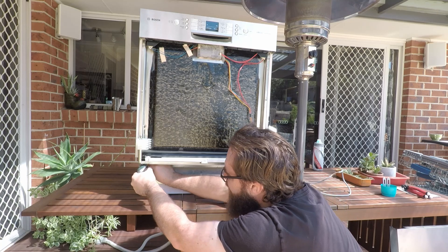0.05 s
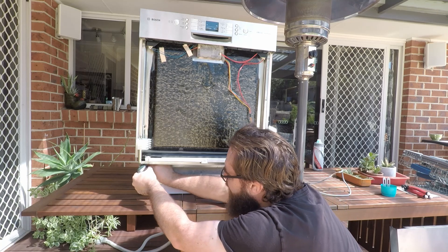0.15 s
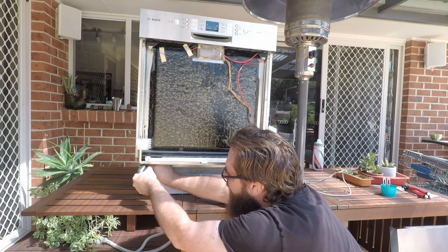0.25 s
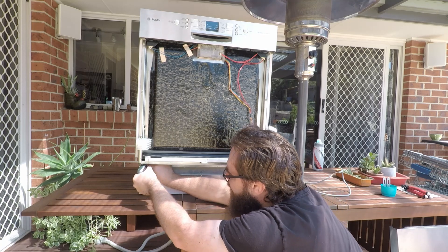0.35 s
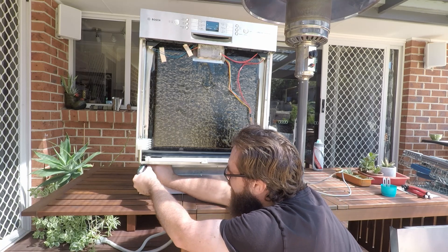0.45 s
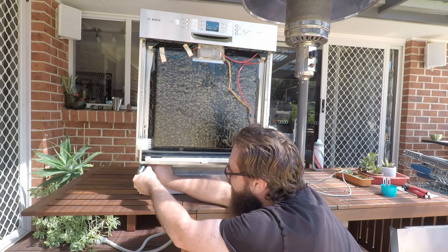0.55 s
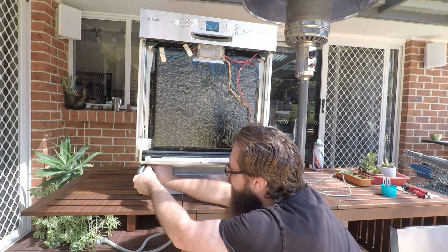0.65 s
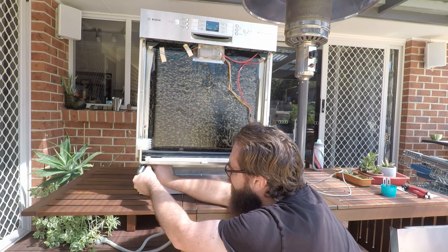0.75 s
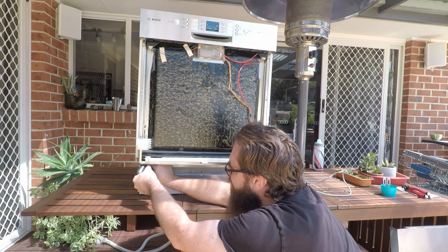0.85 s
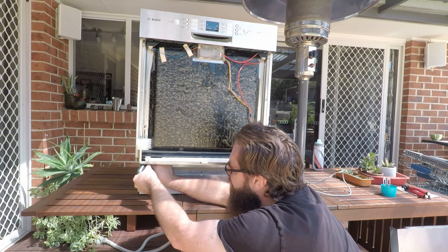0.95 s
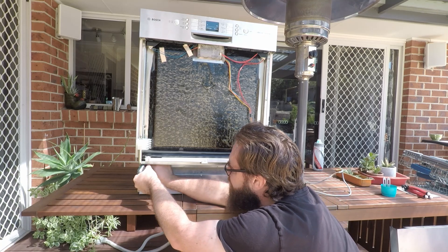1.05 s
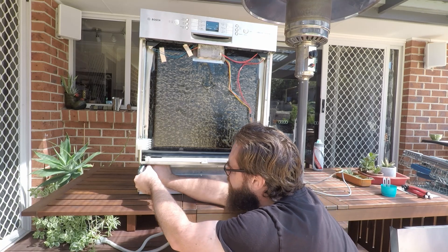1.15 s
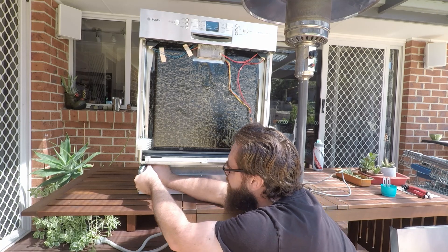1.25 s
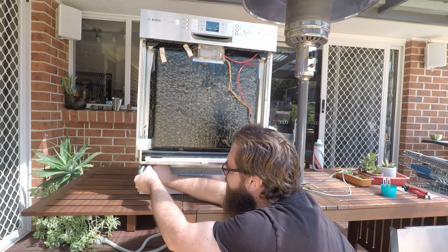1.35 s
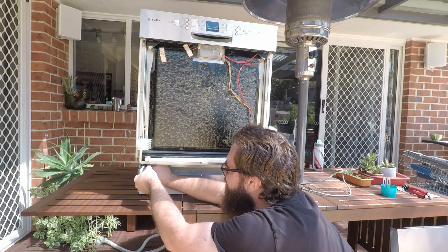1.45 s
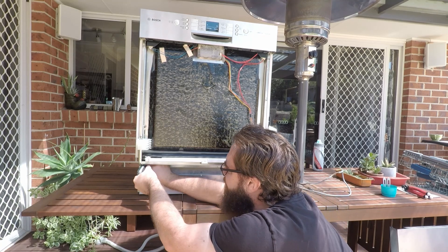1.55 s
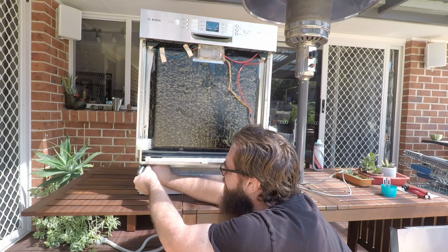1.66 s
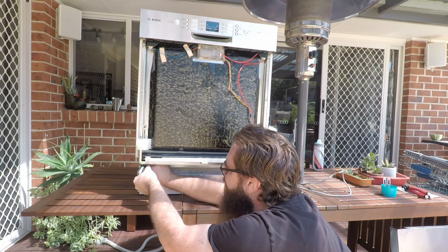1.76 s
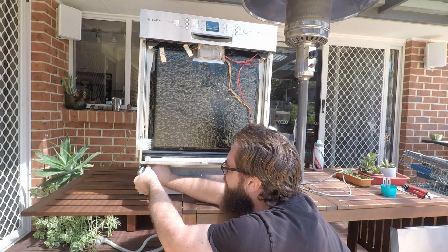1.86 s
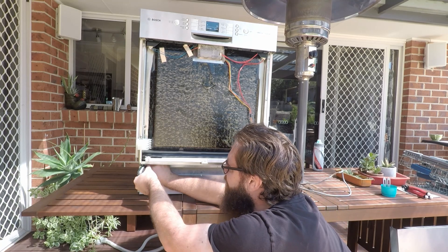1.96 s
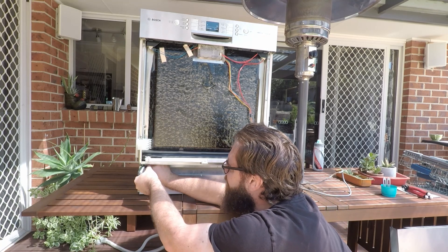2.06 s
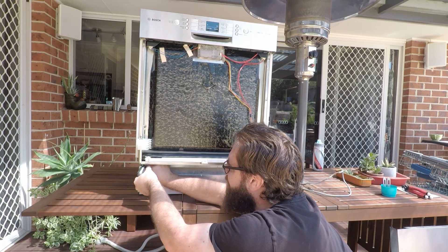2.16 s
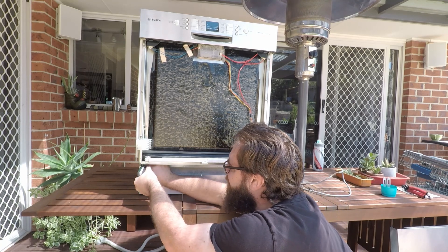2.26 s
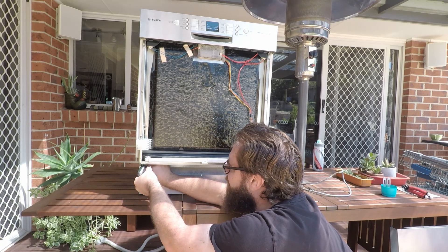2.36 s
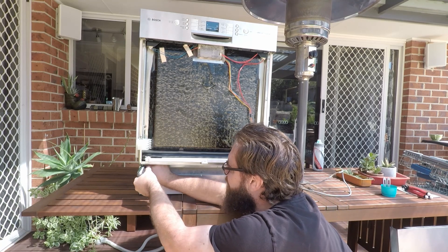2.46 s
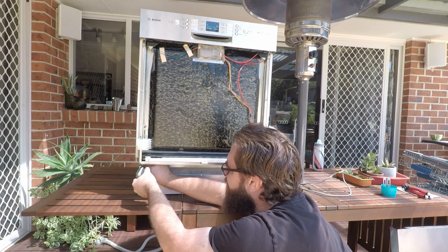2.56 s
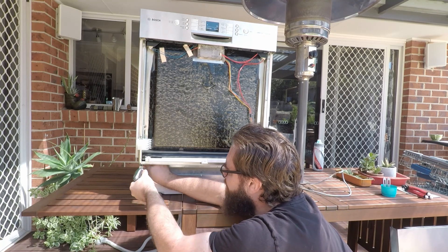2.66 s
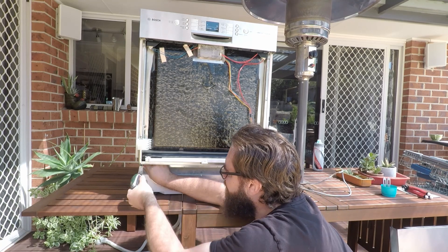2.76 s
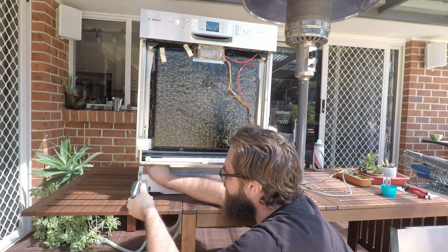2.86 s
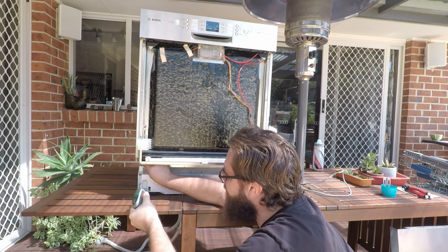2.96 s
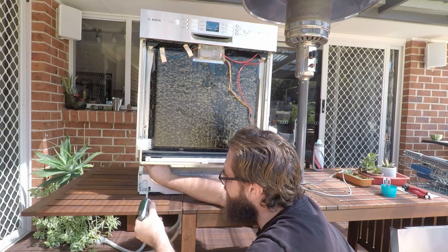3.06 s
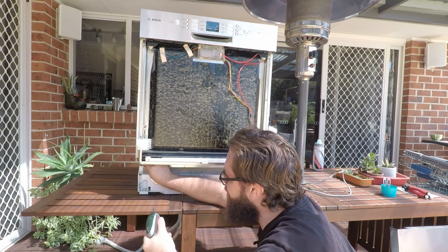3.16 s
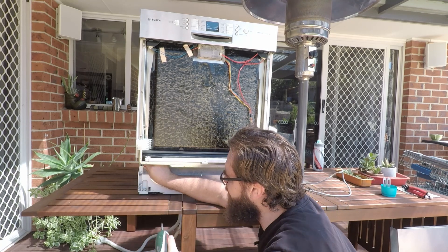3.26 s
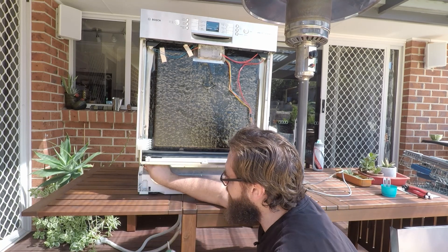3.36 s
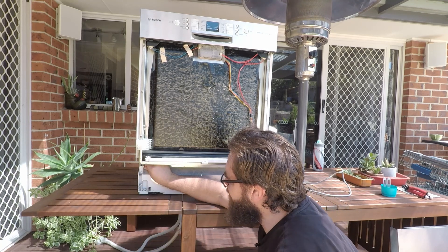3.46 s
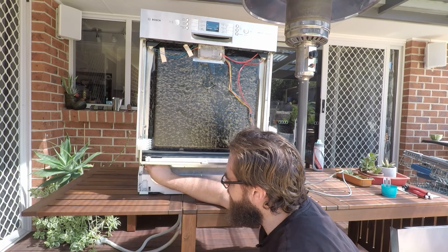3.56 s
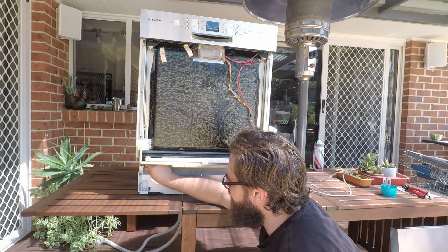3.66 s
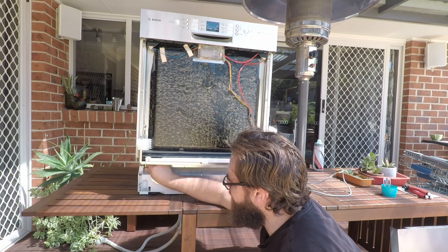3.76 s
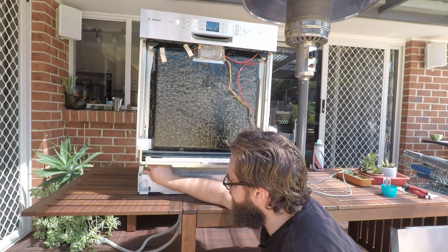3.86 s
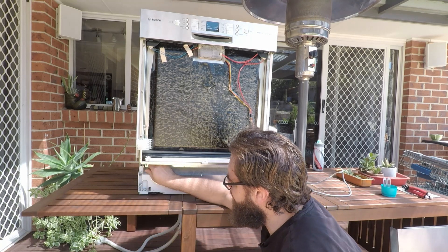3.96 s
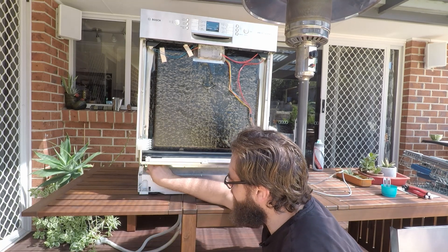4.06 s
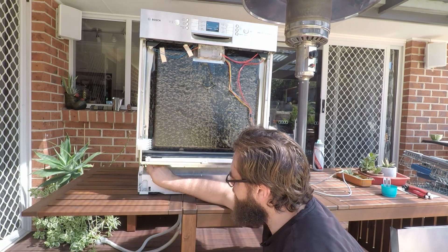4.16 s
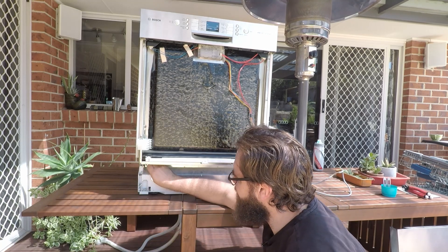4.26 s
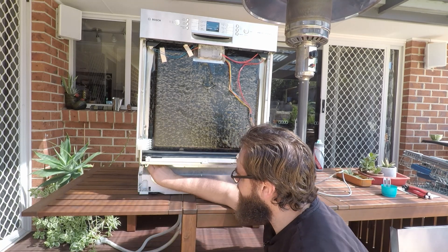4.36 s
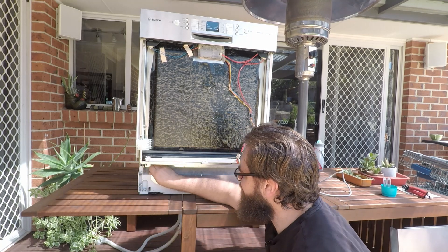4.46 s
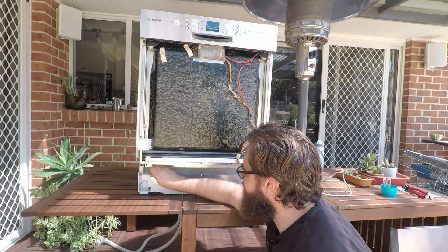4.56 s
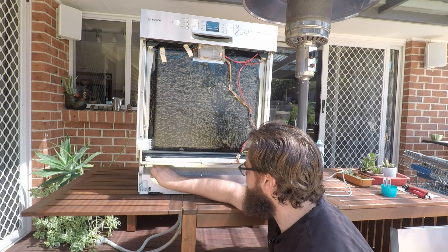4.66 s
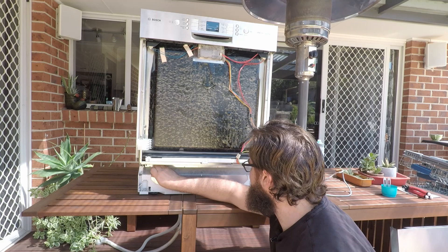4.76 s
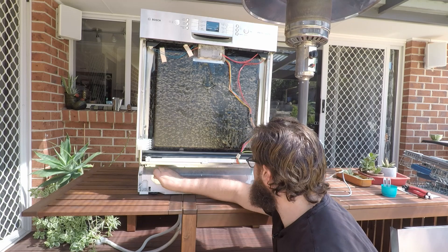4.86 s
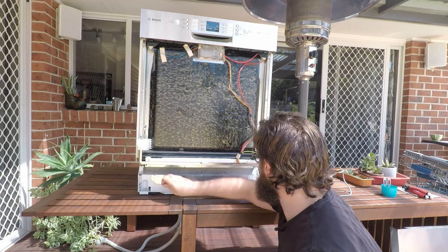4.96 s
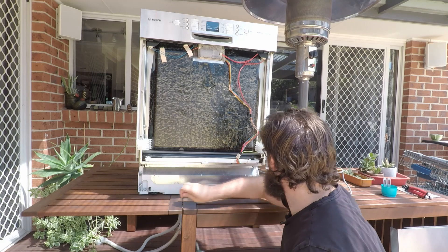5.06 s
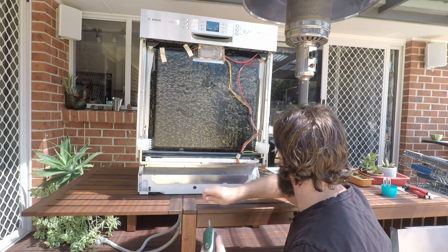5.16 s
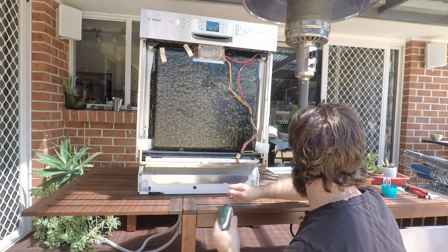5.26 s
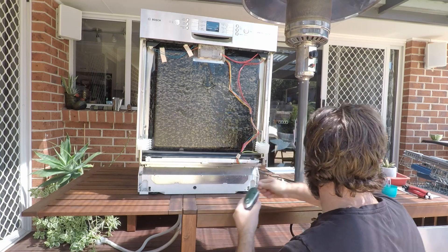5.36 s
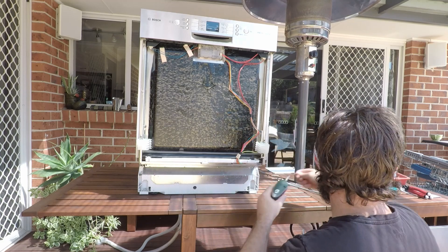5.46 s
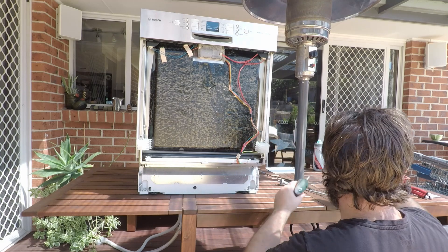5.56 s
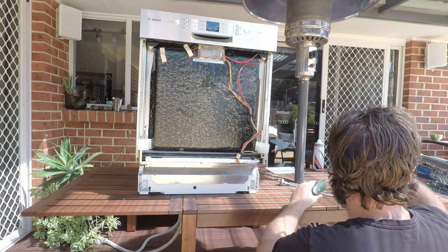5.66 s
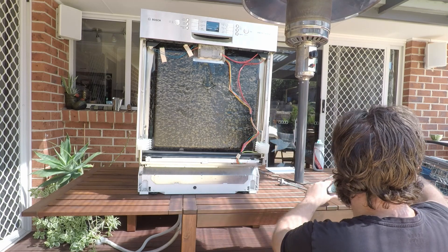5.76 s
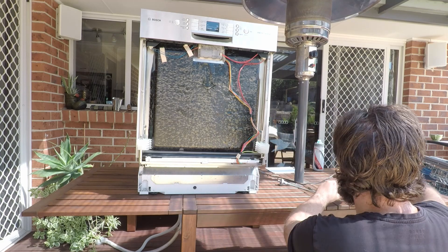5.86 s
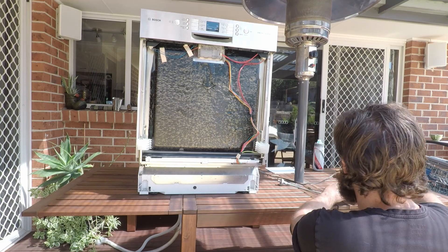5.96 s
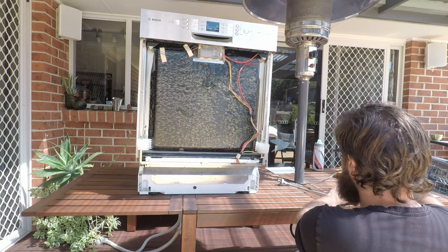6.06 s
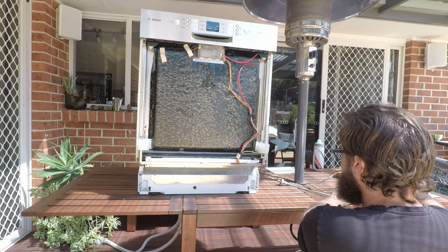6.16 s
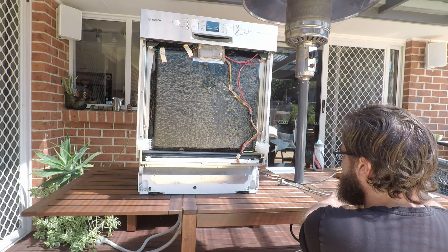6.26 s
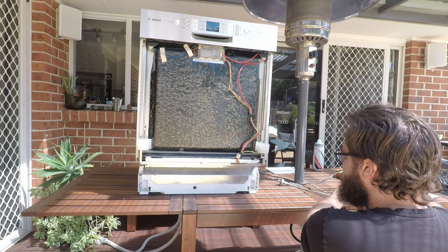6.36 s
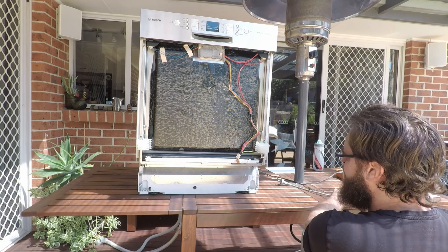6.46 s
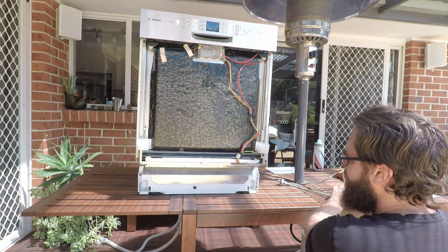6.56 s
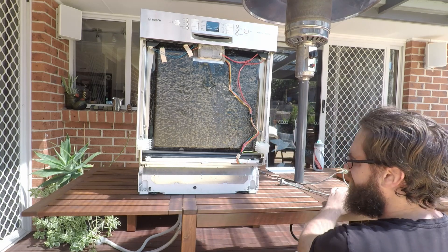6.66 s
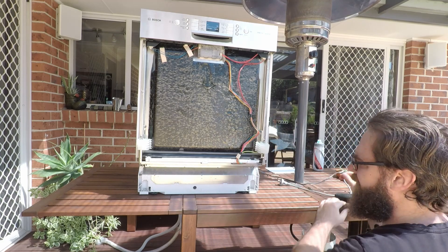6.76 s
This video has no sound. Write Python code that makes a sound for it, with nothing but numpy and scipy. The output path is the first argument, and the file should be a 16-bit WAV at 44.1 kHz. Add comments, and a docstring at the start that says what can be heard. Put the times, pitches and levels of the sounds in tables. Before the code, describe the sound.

Steady whirring of a handheld power screwdriver fills the opening, then its motor slides down to silence with a small thump. Loose ticks and a hard bright clack on a hollow metal cabinet come next, then short scrapes and soft thuds on a wooden table. Calm follows, then a late flurry of clicks and rattling. Covered patio, close microphone, short reflections, low outdoor wash and a faint distant engine.

```python
"""Screwdriver on a sheet-metal cabinet

A small cordless screwdriver backs a screw out of a cabinet on a patio table and coasts to a stop:
harmonics of the motor turn and pulsed gear noise excite the resonances of its housing.
The tool and loose parts then tap (clicks and ringing modes), knock (low damped blows) and scrape (filtered
slips) on cabinet and wood, over a distant engine hum, a faint gliding tone, a low outdoor wash and a hiss."""
import sys
import numpy as np
from scipy import signal
from scipy.fft import rfft, irfft
from scipy.io import wavfile
from scipy.ndimage import uniform_filter1d

SR = 44100
rng = np.random.default_rng(int(sys.argv[2]) if len(sys.argv) > 2 else 0)


def generate_wav(signal):
    """Clip the signal to [-1, 1] and save it as 16-bit WAV at the path in sys.argv[1]."""
    frames = np.transpose(np.atleast_2d(signal))
    scaled = np.clip(frames, -1, 1) * 32767
    pcm = np.round(scaled).astype(np.int16)
    wavfile.write(sys.argv[1], SR, pcm)


N = 299880
HZ, T = np.fft.rfftfreq(N, 1 / SR), np.arange(N) / SR

# Modes of the struck or shaken metal: [pitch_hz, rel_level_db, t60_s]
PANEL_MODES = [(1368, -9, 0.044), (1705, -3, 0.11), (2015, -9, 0.12), (2400, -7, 0.1), (2690, -9, 0.085),
               (3000, -14, 0.12), (3800, -13, 0.07), (6080, -22, 0.07)]
CABINET_UNTIL_S = 4  # contacts fall on the hollow cabinet before this, on solid parts after


def amp(db):
    """Decibels are a logarithmic measure of amplitude: 20 dB is a factor of ten."""
    return 10 ** (np.asarray(db) / 20)


def evened(x):
    """Normalisation: division by the root mean square gives unit power."""
    return x / np.sqrt(np.mean(x ** 2) + 1e-20)


def add(mix, s, sound):
    """Superposition: adds a sound to the mix from s seconds on."""
    part = mix[round(s * SR):][:len(sound)]
    part += sound[:len(part)]


def coloured(x, points):
    """Spectral shaping: weights x by a table of (Hz, dB), interpolated over log frequency."""
    f, db = np.transpose(points)
    gain = amp(np.interp(np.log(HZ + 1), np.log(f + 1), db))
    return irfft(rfft(x) * gain, N)


def band(x, lo_hz, hi_hz):
    """Band-pass filtering: a Butterworth filter keeps what lies between two frequencies."""
    sos = signal.butter(2, [lo_hz, min(hi_hz, .45 * SR)], "band", fs=SR, output="sos")
    return signal.sosfilt(sos, x)


def resonate(x, hz, width):
    """Heterodyned resonance: shifts hz (fixed or moving) to zero, smooths, shifts back; peak gain 1."""
    turn = np.exp(2j * np.pi * np.cumsum(hz * np.ones(len(x))) / SR)
    r = np.exp(-np.pi * width / SR)
    smoothed = signal.lfilter([1 - r], [1, -r], x / turn)
    return 2 * (turn * smoothed).real


def wander(per_s):
    """Slow random modulation of rms 1: twice-averaged noise, sampled coarsely and interpolated."""
    size = max(round(SR / per_s), 1)
    step = max(size // 20, 1)
    coarse = rng.standard_normal(N // step + 2)
    for _ in range(2):
        coarse = uniform_filter1d(coarse, size // step)
    return np.interp(np.arange(N) / step, np.arange(len(coarse)), evened(coarse))


def stroke(s, db, rise_db_per_s, fall_db_per_s):
    """Exponential envelope: climbs to its peak at s and falls away, both straight in dB."""
    return amp(db - np.where(T < s, rise_db_per_s * (s - T), fall_db_per_s * (T - s)))


def screwdriver():
    """Periodic excitation: like knocks each motor turn make harmonics, and shake loose puffs of noise."""
    # Colour of gearbox and housing: [pitch_hz, rel_level_db]
    housing = [(110, -32.5), (180, -12.5), (555, 0), (1030, -1.5), (1620, 4), (2790, -5.5), (3500, -4),
               (5450, -4), (6260, -2), (7400, -5.5), (12300, -4.5), (16000, -25)]
    # Gear whine: [multiple_of_motor_turn, rel_level_db]
    gear_tones = [(1.685, -55), (5.06, -49), (5.6, -58), (6.74, -57), (10.11, -54), (10.7, -55),
                  (11.92, -51), (15.17, -55), (16.84, -53)]
    # Bright resonances of the shell: [pitch_hz, width_hz, drift_db_per_s]
    shell = [(3600, 700, -1), (5600, 350, 8), (6350, 450, -2), (9000, 500, 5)]
    # Multiples of the turn that partly cancel: {order: level_db}
    weak_orders = {3: -8, 6: -8, 15: -5, 16: -8, 20: -6, 24: -4}
    run_turns_per_s, gain_turns_per_s2 = 138.8, .42  # the screw loosens, so the motor slowly gains speed
    release_s, coast_turns_per_s2 = 2.23, 143  # the trigger is let go and the motor slows steadily
    run_db, coast_db_per_s = -34.5 + 1.5, 26.5  # body rms while running, and its fall while coasting
    faster_fall_s, extra_fall_db_per_s = 2.436, 47.5  # from here the level falls faster still
    whine_gain_db = 35.0 - 1.5  # of the whine over the body
    flutter_db, grip_db = 3, 2.5  # the grip shifts on the shell
    stack_share, shell_share = .33, .8
    drift_zero_s = 0.9  # the drifting resonances have no drift gain here

    coasting = np.maximum(T - release_s, 0)
    speed = run_turns_per_s + gain_turns_per_s2 * T - coast_turns_per_s2 * coasting
    speed = np.maximum(speed, 0)
    turns = np.cumsum(speed * (1 + .0015 * wander(15))) / SR + .0025 * wander(140)
    turns += .0075 * np.sin(2 * np.pi * .1 * turns)  # the planet carrier, ten times slower, tugs at the motor
    extra_fall_db = extra_fall_db_per_s * np.maximum(T - faster_fall_s, 0)
    level = amp(run_db - coast_db_per_s * coasting - extra_fall_db)
    mesh = (speed / speed.max()) ** 8  # the teeth lose their load as soon as the motor coasts

    stack = np.zeros(N)
    for k in range(3, 46):
        strength = amp(flutter_db * wander(7.26) + weak_orders.get(k, 0)) / (1 + (k / 50) ** 2)
        phase = 0.009 * k ** 2  # smears the knock a little
        stack += strength * np.cos(2 * np.pi * k * turns + phase)
    puff = 0.45 + amp(wander(220)) * np.exp(-((turns + 0.057) % 1) / 0.5)
    uneven = amp(.7 * wander(40) + 1.5 * wander(1200))
    rattle = evened(puff * uneven * rng.standard_normal(N)) + stack_share * mesh * evened(stack)

    bright = np.zeros(N)
    for hz, width, drift in shell:
        drift_db = drift * (np.minimum(T, release_s) - drift_zero_s)
        bright += amp(grip_db * wander(24.0) + drift_db) * resonate(rattle, hz, width)
    body = coloured(rattle + shell_share * bright, housing)
    whine = sum(amp(db + flutter_db * wander(25)) * np.sin(2 * np.pi * k * turns) for k, db in gear_tones)
    return level * (body / np.std(body[:SR]) + amp(whine_gain_db) * mesh * whine)


def taps():
    """Impact excitation: a short click, then a decaying rattle in several bands that also rings the panel."""
    # Taps on metal and plastic: [start_s, level_db, click_pitch_hz, treble_db, ring_db]
    tap_rows = [(2.485, -24, 1340, 2.5, -4.5), (2.5542, -21.5, 1660, -30, -8), (2.587, -31, 1250, 0.5, 1),
                (2.601, -31.5, 1090, 2, -3.5), (2.7635, -17, 1840, 1.5, -12.5), (2.846, -30, 2030, -6, -15),
                (2.855, -20.5, 2020, -6.5, -15.5), (2.9772, -35.5, 2060, -3.5, -4),
                (3.0074, -32.5, 1730, -11, -6), (3.0774, -13, 1830, -12, -7.5),
                (3.0867, -6, 1920, -0.5, -17), (3.3488, -23.5, 1820, -5, -4),
                (3.394, -26.5, 2100, -12, -16.5), (3.473, -32.5, 1670, -15, -9.5),
                (3.519, -18.5, 1610, -5, -8), (3.649, -33, 1390, -9.5, -3.5),
                (3.7772, -24, 1320, -18, -8.5), (3.8964, -30, 2510, 10, -17),
                (5.129, -35.5, 1770, -20, -23), (5.1986, -44.5, 2460, -27, -22),
                (5.601, -40.5, 10900, -10, -28), (6.106, -21, 1460, 6, -12), (6.18, -21.5, 1210, -7, -19),
                (6.238, -23.5, 1170, -7, -12), (6.298, -19.5, 1320, 4.5, -6.5),
                (6.3937, -24, 1330, -12, -17), (6.415, -24.5, 1290, -10, -18),
                (6.483, -27.5, 2730, -5.5, -9), (6.496, -26, 2650, -26, -11.5),
                (6.7797, -33.5, 10000, -17, -49.5)]
    hollow_db, solid_db = -3.5, -14  # low rattle of the hollow cabinet and of solid parts
    spot_db, metal_share = 3.5, .07  # each blow lands elsewhere and favours other modes

    out, t = np.zeros(N), np.arange(SR // 2) / SR
    modes = np.array([amp(db - 60 * t / t60) * np.sin(2 * np.pi * hz * t) for hz, db, t60 in PANEL_MODES])
    fall = amp(-60 * t / 0.066) * (1 - np.exp(-t / 0.0015))
    for s, db, hz, treble_db, ring_db in tap_rows:
        noise = rng.standard_normal(len(t))
        click = np.sin(2 * np.pi * hz * t) * (t * hz) ** 2 * np.exp(-t * hz / 0.58)
        snap = .5 * evened(band(noise, 4000, 10500)) * np.exp(-t / 0.0009)
        ring = evened(band(band(noise, 0.81 * hz, 1.46 * hz), 0.89 * hz, 1.49 * hz))
        low_db = hollow_db if s < CABINET_UNTIL_S else solid_db
        ring += amp(low_db) * evened(band(noise, 400, 950))
        if s > CABINET_UNTIL_S and hz < 1600:  # solid parts click and ring about an octave up as well
            click += 0.49 * np.sin(4 * np.pi * hz * t) * (t * hz) ** 2 * np.exp(-t * hz / 0.54)
            ring += 0.92 * evened(band(noise, 2.25 * hz, 2.57 * hz))
        ring += amp(treble_db) * evened(band(noise, 3200, 9400)) * fall ** 0.84

        strike = noise[:200] * np.exp(-t[:200] / 0.0023)
        mode_mix = amp(spot_db * rng.standard_normal(len(PANEL_MODES))) @ modes
        metal = signal.fftconvolve(strike, mode_mix)[:len(t)]
        metal *= metal_share * min(hz / 1700, 1) ** 2  # low taps ring the metal less
        add(out, s, amp(db) * (6 * click + amp(treble_db) * snap + amp(ring_db) * (ring * fall + metal)))
    return out


def knocks():
    """Damped modes of wood: a blow and lumpy rattle drive boards, the higher dying first; the top rings on."""
    # Dull knocks on the table: [start_s, level_db, pitch_hz, t60_s]
    knock_rows = [(1.931, -26, 590, 0.035), (1.997, -17, 540, 0.081), (2.199, -22.5, 610, 0.04),
                  (3.008, -22.5, 305, 0.37), (3.595, -39.5, 680, 0.046), (3.677, -39.5, 653, 0.058),
                  (3.702, -35, 557, 0.053), (3.816, -28, 444, 0.17), (4.353, -29.5, 266, 0.47),
                  (4.921, -33.5, 267, 0.37), (6.169, -22, 318, 0.71), (6.402, -26.5, 300, 0.53)]
    # Modes of the table top: [pitch_hz, rel_level_db, t60_s]
    top_modes = [(173, 2, 0.4), (260, 0, 0.4)]
    # Looser boards that buzz along: [pitch_hz]
    boards_hz = [265, 324, 510, 624, 840, 1030]
    hold_s, lumpy_db, gain_db = 0.009, 3, -11.5  # time before the decay, unevenness, gain on all knocks

    out, t = np.zeros(N), np.arange(SR // 2) / SR
    top = sum(amp(db - 60 * t / t60) * np.sin(2 * np.pi * hz * t) for hz, db, t60 in top_modes)
    for s, db, hz, t60 in knock_rows:
        noise = band(band(rng.standard_normal(len(t)), 80, 1700), 80, 1700)
        lumps = evened(uniform_filter1d(rng.standard_normal(len(t)), 250))
        noise = noise * amp(lumpy_db * lumps)
        shape = (1 - np.exp(-t / 0.0054)) * amp(-60 * np.maximum(t - hold_s, 0) / max(t60, .01))
        weight = 300 / hz  # heavy knocks sound low and shake more loose
        blow = np.sin(2 * np.pi * hz * t) * np.exp(-t / 0.0062) / weight ** 1.8
        wood = 0.59 * evened(resonate(noise, hz, 260)) + blow
        boards = np.zeros(len(t))
        for board_hz in boards_hz:
            boards += 350 / board_hz * evened(resonate(noise, board_hz, 70)) * shape ** (board_hz / 600)
        ring = signal.fftconvolve(noise * shape, top)[:len(t)]
        ring *= amp(-4) * weight ** 2 / abs(ring).max()
        add(out, s, amp(db + gain_db) * ((wood + 0.24 * weight ** 2 * boards) * shape + ring))
    return out


def scrapes():
    """Frictional excitation: dense uneven slips drive the rubbed metal; loose parts collide and ring briefly."""
    # Scrape strokes: [loudest_s, level_db, rise_db_per_s, fall_db_per_s, treble_db]
    strokes = [(3.359, -39.5, 2000, 216, -11), (3.85, -50, 104, 161, -29), (3.873, -35, 300, 211, -36),
               (3.982, -48, 161, 138, -53), (4.464, -40.5, 265, 256, -46)]
    # Resonances of the rubbed metal: [pitch_hz, width_hz, rel_level_db]
    rubbed = [(1000, 860, -18), (1640, 350, -5), (2540, 170, -2), (3800, 120, -8)]
    # Loose parts set shaking in the hand: [loudest_s, level_db, fall_db_per_s]
    shakes = [(4.539, -57.5, 80), (5.21, -77, 66), (5.91, -78, 110), (6.124, -45.5, 53), (6.18, -59, 99.5),
              (6.315, -39, 151), (6.419, -49.5, 246)]
    shake_rise_db_per_s, shake_treble_db = 1500, -7
    rise_per_db = .006  # the rubbed cabinet rings higher as the stroke presses harder
    bumps_per_s = 130  # separate small impacts

    slips = rng.standard_normal(N) * amp(3 * wander(900) + 1.2 * wander(120))
    press_db = 20 * np.log10(sum(stroke(*row[:4]) for row in strokes) + 1e-9)
    press_db = np.clip(press_db - press_db.max() + 8.5, -15, 10)
    bend = 1 + rise_per_db * press_db * (T < CABINET_UNTIL_S)
    metal = 0.081 * band(slips, 290, 2100)
    for hz, width, db in rubbed:
        metal += amp(db + 2.5 * wander(40)) * resonate(slips, hz * bend, width)
    metal = evened(metal)

    bumps = 12 * (rng.random(N) < bumps_per_s / SR) * rng.standard_normal(N)
    contacts = slips * amp(2 * wander(300)) * .5 + bumps
    ringing = sum(amp(db) * resonate(contacts, hz, 39) for hz, db, _ in PANEL_MODES)
    loose = evened(band(contacts, 940, 2840)) + evened(ringing)
    fizz = evened(band(band(slips, 2150, 8500), 2070, 9000))
    rubbing = sum(stroke(*row) * (metal + amp(treble_db) * fizz) for *row, treble_db in strokes)
    shaking = np.max([stroke(s, db, shake_rise_db_per_s, fall) for s, db, fall in shakes], axis=0)
    return rubbing + shaking * (loose + amp(shake_treble_db) * fizz)


def thump():
    """Transient low mode: a few cycles that sag in pitch, with three sharp kicks about their start."""
    # The hand jolts the cabinet: [start_s, level_db, from_hz, to_hz, length_s]
    jolt = (2.245, -29, 170, 85, .045)
    kicks_s, kick_db = (2.2372, 2.2454, 2.2532), -20  # the gears kick back

    s, db, from_hz, to_hz, length = jolt
    u = np.clip((T - s) / length, 0, None)
    turns = np.cumsum(to_hz + (from_hz - to_hz) * np.exp(-2 * u)) / SR
    out = amp(db) * 4 * u ** 2 * np.exp(-2 * u ** 2) * np.sin(2 * np.pi * turns)
    kick = band(band(signal.unit_impulse(SR // 20), 120, 800), 120, 800)
    for kick_s in kicks_s:
        add(out, kick_s, -amp(kick_db) * kick / kick.max())
    return out


def patio(x):
    """Reverberation: sparse echoes of random sign from walls and roof; the treble dies first."""
    t = np.arange(SR // 2) / SR
    echoes = rng.choice([-1., 1.], len(t)) * (rng.random(len(t)) < .05) * (t > .004)
    low_tail = band(echoes, 120, 4800) * amp(-60 * t / 0.19)
    treble_tail = 1.63 * band(echoes, 2400, 18000) * amp(-60 * t / 0.13)
    tail = low_tail + treble_tail
    return signal.fftconvolve(x, tail / np.linalg.norm(tail))[:N]


def hum():
    """Frequency-modulated sine: a wavering low engine tone that sags, then drops to a slower speed and fades."""
    # Engine hum, one row a speed: [start_s, end_s, pitch_hz, sag_hz_per_s, level_db, fade_db_per_s]
    speeds = [(0, 3.45, 127.2, 1.7, -52, 0.3), (3.452, 6.1, 105.5, 2.9, -51, 3)]
    out = np.zeros(N)
    for start, end, hz, sag, db, fade_db in speeds:
        on = np.clip(np.minimum(T - start + 0.043, end + 0.13 - T) / 0.11, 0, 1)
        turns = np.cumsum((hz - sag * (T - start)) * (1 + .01 * wander(10.0))) / SR
        level = np.sqrt(2) * amp(db - fade_db * (T - start) + 2 * wander(39))  # from rms to sine peak
        out += on * level * np.sin(2 * np.pi * turns)
    return out


def faint_tone():
    """Narrow-band noise: a moving resonance makes a fuzzy, broken whistle that glides up."""
    # A faint tone rises in the distance: [start_s, end_s, from_hz, to_hz, level_db]
    glide = (5.79, 6.12, 445, 515, -67)
    start, end, from_hz, to_hz, db = glide
    on = np.clip(np.minimum(T - start, end - T) * 20, 0, 1)
    hz = np.interp(T, (start, end), (from_hz, to_hz))
    whistle = resonate(resonate(rng.standard_normal(N), hz, 30), hz, 30)
    return on * amp(db) * evened(whistle)


def yard():
    """Broadband noise: a low wash and a treble hiss, each swelling a little, over a gently wavering rumble."""
    # Spectrum of the wash: [pitch_hz, rel_level_db]
    wash_colour = [(80, -29), (130, 1.5), (400, -7), (800, -6), (1500, -12), (1900, -30), (3000, -53)]
    # Spectrum of the hiss: [pitch_hz, rel_level_db]
    hiss_colour = [(1470, -46.5), (2500, -18.5), (4600, -20), (5880, -13.5), (8040, -10), (9880, -12.5),
                   (15500, -30)]
    # Background levels, the wash without its upper band: [time_s, wash_db, hiss_db]
    levels = [(2.7, -57.5, -72), (4.201, -61.5, -73.5), (4.7, -58, -66.5), (5.301, -65.5, -75),
              (5.9, -61.5, -71), (6.8, -63.5, -73)]
    dulls_s, bright_db, dull_db = (3.6, 4.9), -7.5, -18  # the wash's upper band weakens between these times

    s, wash_db, hiss_db = np.transpose(levels)
    wash = evened(coloured(rng.standard_normal(N), wash_colour))
    hiss = evened(coloured(rng.standard_normal(N), hiss_colour))
    upper = evened(band(band(rng.standard_normal(N), 870, 2600), 870, 2600))
    wash += amp(np.interp(T, dulls_s, (bright_db, dull_db))) * upper
    rumble = evened(band(band(rng.standard_normal(N), 35, 120), 35, 120))
    rumble *= amp(-59.0 + 2 * wander(4.2))
    wash *= amp(np.interp(T, s, wash_db) + 1.2 * wander(8))
    hiss *= amp(np.interp(T, s, hiss_db) + wander(40))
    return wash + hiss + rumble


def scene():
    """Superposition of the sources; only the hand-made sounds are given echoes."""
    hands = thump() + taps() + knocks() + scrapes()
    near = screwdriver() + hands + amp(-7.0) * patio(hands)
    return (near + hum() + faint_tone() + yard())[None]


def record(dry):
    """Band limitation: the microphone drops the deepest bass, the recorder the highest treble."""
    edge_hz = 15900
    heard = signal.sosfilt(signal.butter(3, 38, "high", fs=SR, output="sos"), dry)
    low_pass = signal.firwin(511, edge_hz, window=("kaiser", 9), fs=SR)
    return signal.oaconvolve(heard, low_pass[None], "same")


dry = scene()
out = record(dry)
generate_wav(out)
```